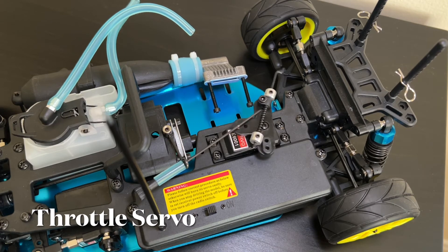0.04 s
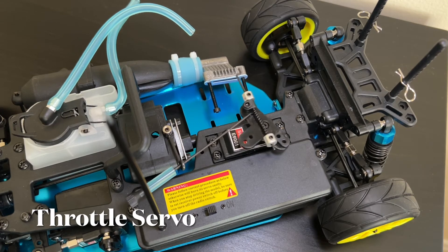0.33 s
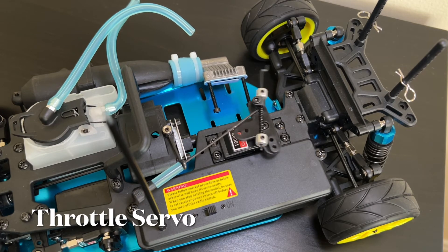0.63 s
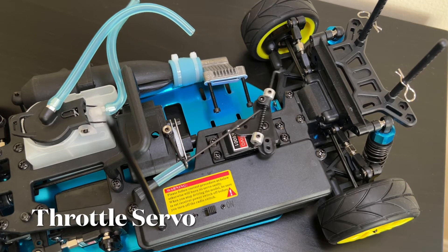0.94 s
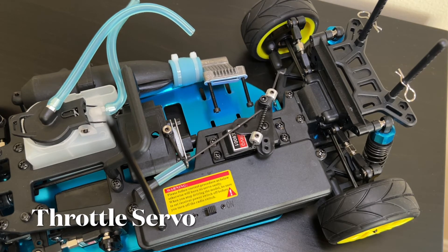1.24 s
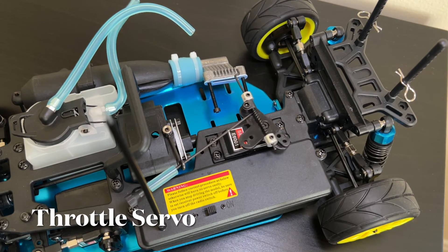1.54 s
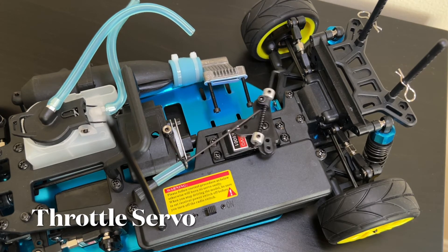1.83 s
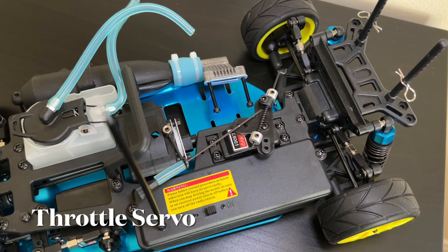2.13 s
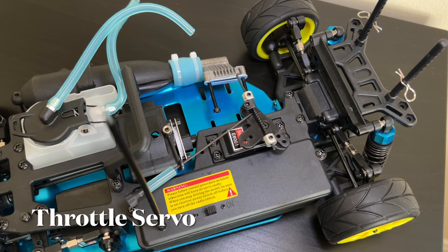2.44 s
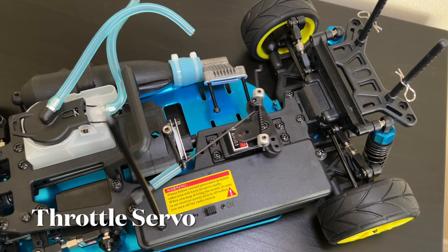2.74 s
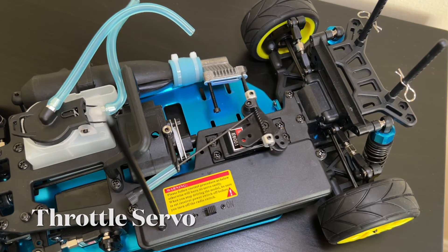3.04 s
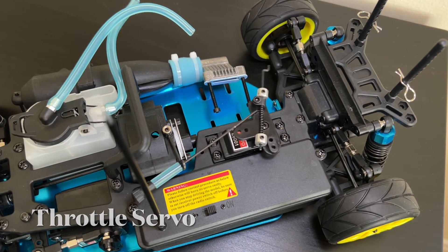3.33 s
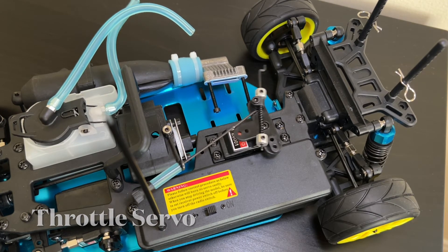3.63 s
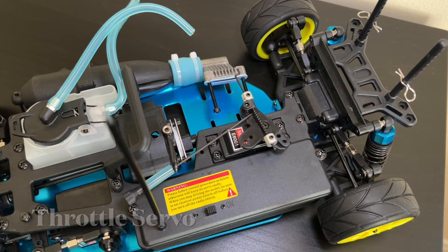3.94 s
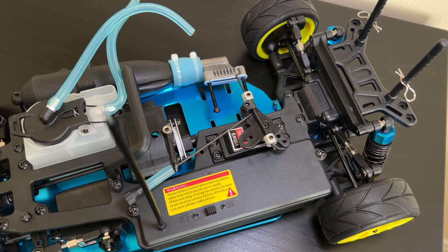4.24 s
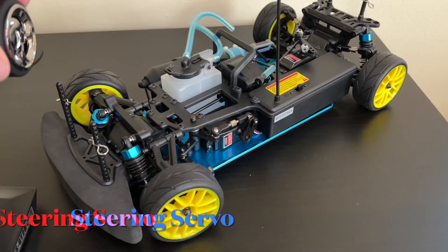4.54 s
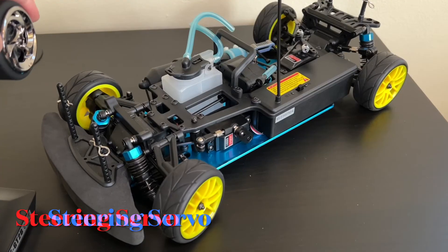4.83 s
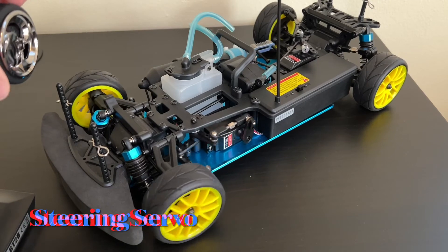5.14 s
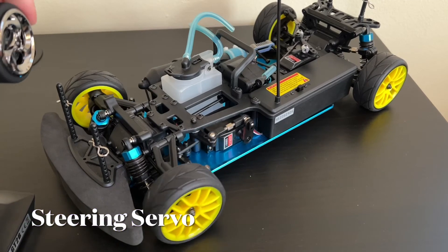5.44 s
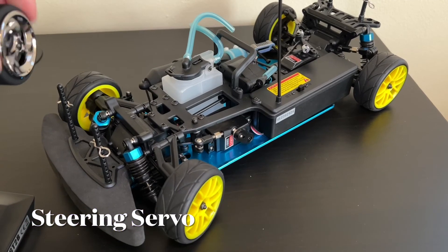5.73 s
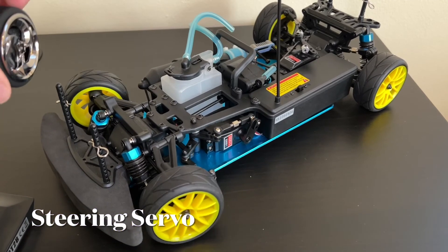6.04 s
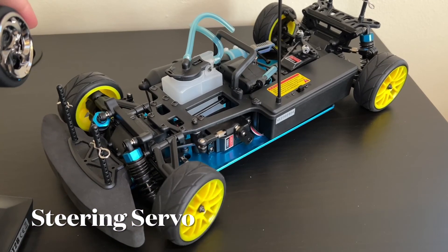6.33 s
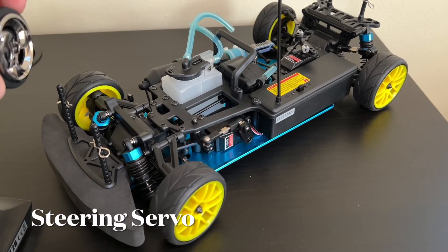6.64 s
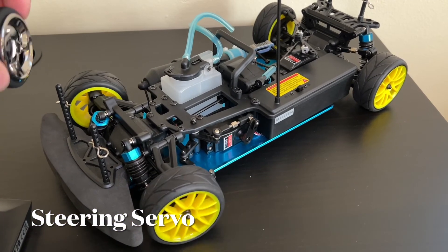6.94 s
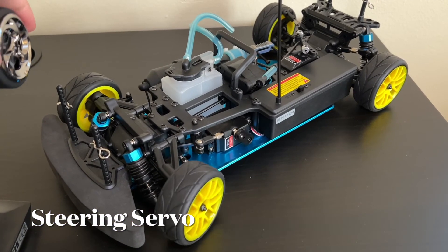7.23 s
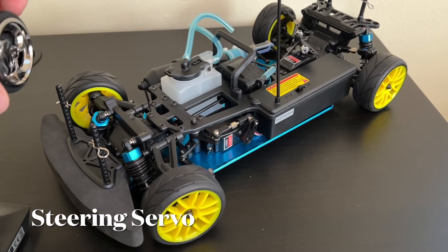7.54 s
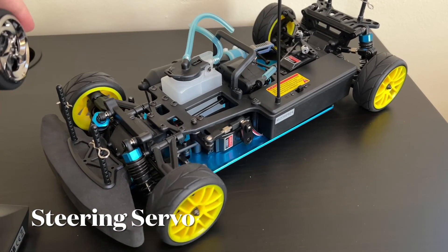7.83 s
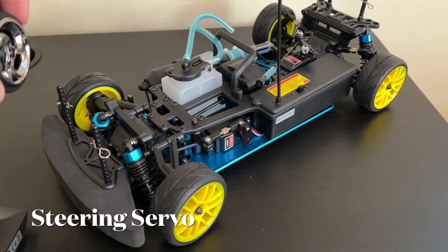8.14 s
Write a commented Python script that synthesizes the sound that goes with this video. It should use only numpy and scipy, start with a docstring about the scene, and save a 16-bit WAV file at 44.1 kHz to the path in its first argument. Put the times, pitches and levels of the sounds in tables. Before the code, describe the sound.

Small servo motors on a model car rattle and buzz in quick strokes, then whine more quietly back and forth.

```python
"""Model car servos on a table

Two hobby servos swing back and forth in a small room, close to a phone. First the throttle servo
rattles through quick strokes, snapping its linkage; then the quieter steering servo whines as it turns
the wheels. Each motor drives a ten-tooth pinion: the mesh sings, loose teeth clatter in the case.
The steering brushes ring the motor can, and the chassis thuds on its tyres over a low room hum."""
import sys
import numpy as np
from scipy import signal
from scipy.fft import rfft, irfft, next_fast_len
from scipy.io import wavfile
from scipy.ndimage import uniform_filter1d

SR = 44100
rng = np.random.default_rng(int(sys.argv[2]) if len(sys.argv) > 2 else 0)


def pcm_store(signal):
    """Save signal as 16-bit PCM."""
    levels = np.round(np.clip(np.atleast_2d(signal), -1, 1) * 32767)
    wavfile.write(sys.argv[1], SR, levels.astype(np.int16).T)


N = 365809
T = np.arange(N) / SR
FFT_SIZE = next_fast_len(N, real=True)
FREQS = np.fft.rfftfreq(FFT_SIZE, 1 / SR)
PINION_TEETH, CRAWL_HZ = 10, 417  # the steering's tooth rate idles at the crawl
HANDOVER_S = 4.318  # the listener moves from the throttle servo to the steering servo

# steering swings: start_s, brake_s, rest_s, early_tooth_hz, late_tooth_hz, whine_db, gears_db, brush_db
SWINGS = [(4.26, 4.347, 4.49, 1892, 1884, -36.5, -41.5, -40),
          (4.494, 4.593, 4.61, 1670, 1678, -43.5, -44.5, -44.5),
          (4.577, 4.678, 4.8, 1678, 1672, -46, -42.5, -44.5),
          (4.665, 4.754, 4.92, 1394, 1391, -56, -47.5, -45),
          (4.914, 5.11, 5.293, 2015, 1896, -37.5, -41.5, -40.5),
          (5.305, 5.53, 5.63, 1950, 1985, -41.5, -43.5, -44),
          (5.712, 5.96, 6.11, 1990, 1959, -37.5, -42.5, -40.5),
          (6.08, 6.296, 6.39, 1978, 2004, -41, -42.5, -43),
          (6.494, 6.703, 6.9, 2031, 1963, -38, -41.5, -40.5),
          (6.891, 7.1, 7.23, 1997, 2000, -41, -42.5, -42.5),
          (7.255, 7.45, 7.64, 2041, 1856, -38, -39, -40.5),
          (7.661, 7.847, 8.06, 1996, 2009, -41, -42.5, -45),
          (8.013, 8.203, 8.47, 1758, 1905, -39, -40, -42)]


def undb(db):
    """Decibels to gain."""
    return np.exp(np.asarray(db) * (np.log(10) / 20))


def unit(x):
    """Scale to rms 1."""
    return x / np.sqrt(np.mean(x ** 2) + 1e-18)


def on_log(hz, points):
    """Read (Hz, value) points on a log-frequency axis."""
    freqs, values = np.transpose(points)
    return np.interp(np.log(hz + 1), np.log(freqs), values)


def colour(x, points):
    """EQ with a curve of (Hz, dB) points."""
    size = next_fast_len(x.shape[-1], real=True)
    gain = undb(on_log(np.fft.rfftfreq(size, 1 / SR), points))
    return irfft(rfft(x, size) * gain, size)[..., :x.shape[-1]]


def resonate(x, modes):
    """Ring through (Hz, width Hz, dB) modes."""
    response = sum(undb(db) * FREQS * width / (FREQS * width + 1j * (FREQS ** 2 - hz ** 2))
                   for hz, width, db in modes)
    return irfft(rfft(x, FFT_SIZE) * response, FFT_SIZE)[:N]


def drift(rate_hz):
    """Smooth random motion of rms 1, changing about rate_hz times a second."""
    hold = max(int(SR / rate_hz), 1)
    steps = np.repeat(rng.standard_normal(N // hold + 1), hold)
    return unit(uniform_filter1d(steps, hold)[:N])


def fade(t, t60):
    """Exponential decay, 60 dB down after t60 seconds."""
    return np.exp(-np.log(1000) * t / t60)


def clicks(times, sizes):
    """Band-limited clicks at exact times."""
    at = np.asarray(times)[:, None] * SR
    taps = at.astype(int) + np.arange(-5, 7)
    shape = np.sinc(taps - at) * np.cos(np.pi * (taps - at) / 12) ** 2
    return np.bincount(np.clip(taps, 0, N - 1).ravel(), (shape * sizes[:, None]).ravel(), N)


def strike(events, ring):
    """Trigger a ring at each (s, dB) row."""
    times, db = np.transpose(events)
    return signal.fftconvolve(clicks(times, undb(db)), ring / np.abs(ring).max())[:N]


def gear_whine(teeth, partials, wobble_rad, flutter_db):
    """Mesh tone from the running tooth count; the off-centre pinion bends it once a turn."""
    phase = 2 * np.pi * teeth + wobble_rad * np.sin(2 * np.pi * teeth / PINION_TEETH + drift(15))
    return unit(sum(undb(db + flutter_db * drift(130)) * np.sin(k * phase) for k, db in partials))


def gear_clatter(teeth, scatter_db, slop, wear_db, scrape):
    """Each tooth lands early or late (by slop tooth gaps) with its own force, then scrapes along."""
    tooth = np.arange(int(teeth[-1]))
    timing, force = rng.standard_normal((N // 20, 2))[tooth].T
    wear = rng.standard_normal(PINION_TEETH)[tooth % PINION_TEETH]
    late = timing * np.interp(tooth, teeth, np.broadcast_to(slop, N))
    hits = clicks(np.interp(tooth + late, teeth, T), undb(scatter_db * force + wear_db * wear))
    friction = rng.standard_normal(N) * np.exp(-2 * (teeth % 1))
    return unit(unit(hits) + scrape * unit(friction))


def throttle_servo():
    """Each stroke speeds up and brakes in an arch; the loaded gears chatter and ring the case."""
    # motor strokes: start_s, end_s, top_tooth_hz, level_db, whine_db (on top of level_db)
    strokes = [(-.1, 0.043, 2128, -25, -17), (.104, .302, 1786, -23.5, -27), (.333, .5, 2136, -24.5, -7),
               (.549, .76, 1451, -22.8, -17), (.768, .945, 2018, -25.5, -6.5),
               (1.241, 1.416, 2124, -23.5, -16), (1.689, 1.862, 2176, -25, -9.5),
               (2.142, 2.316, 2202, -23, -22), (2.387, 2.487, 698, -43.5, -14.5),
               (2.594, 2.66, 699, -38.5, -14.5), (2.631, 2.821, 1201, -28.5, -10),
               (2.912, 3.049, 1447, -22.5, -15), (3.138, 3.301, 1498, -26.5, -19),
               (3.32, 3.491, 1076, -29, -11.5), (3.546, 3.678, 1754, -25, -22),
               (3.712, 3.853, 1895, -23, -23), (3.948, 4.084, 2086, -25.5, -5),
               (4.084, 4.215, 1886, -22, -23)]
    # how the case radiates the clatter: freq_hz, gain_db
    case_eq = [(300, -22), (700, -15.5), (1200, -7.5), (1600, -11), (2000, -0.5), (2700, -3), (3300, 0),
               (3900, -2), (4500, 1), (5400, 5.5), (6700, -4), (7600, 0.5), (8900, 0), (9600, 4.5),
               (10400, -5), (11900, -2), (13200, -2), (14100, -2.5), (15300, 0)]
    # resonances of case and deck: pitch_hz, width_hz, gain_db
    case_modes = [(1990, 205, 2), (2906, 200, 4), (3288, 45, -14), (4400, 140, -7), (5000, 53, -14),
                  (5270, 190, -2.5), (5450, 39.3, -13), (6370, 50, -2), (6280, 54, 3), (7144, 180, 8),
                  (7340, 46, -6), (9100, 46, 5), (8860, 70, -13.5), (11920, 720, 6.5), (14260, 96, 14)]
    # mesh partials: tooth_rate_multiple, level_db
    partials = [(1, -8.5), (2, -8), (3, -3), (4, 3)]
    # how the deck radiates the mesh tone: freq_hz, gain_db
    deck_eq = [(700, -15), (1150, 1), (1500, 1), (2100, 9.5), (3200, 7.5), (4200, -20), (5400, 6),
               (6300, 4.5), (9000, -2)]
    onset_db, attack_s, stop_db, release_s = 15, .016, 21.5, .014  # load dips at both ends of a stroke
    ease_db = 3  # and eases along the way
    tooth_hz, whine_gain, load = np.full(N, 300.), np.zeros(N), np.zeros(N)
    for start, end, top_hz, level_db, whine_db in strokes:
        on = (T > start) & (T < end)
        progress = (T[on] - start) / (end - start)
        tooth_hz[on] = top_hz * (1 - .5 * (2 * progress - 1) ** 2)
        whine_gain[on] = undb(whine_db) * np.sin(np.pi * progress) ** 2
        attack_db = onset_db * np.exp((start - T[on]) / attack_s)
        release_db = stop_db * np.exp((T[on] - end) / release_s)
        load[on] += undb(level_db - attack_db - release_db - ease_db * progress)
    load = uniform_filter1d(load, size=330)  # the rotor takes a moment to start
    teeth = np.cumsum(tooth_hz * (1 + .009 * drift(150))) / SR
    slop = np.clip(.02 + 1.4 * load, 0, .2)  # teeth keep time under light load, rattle when pushed
    hits = gear_clatter(teeth, scatter_db=4, slop=slop, wear_db=2, scrape=.82)
    gears = colour(hits * undb(.79 * drift(70) + drift(900)), case_eq)
    case = unit(unit(gears) + undb(-3.5) * unit(resonate(gears, case_modes)))
    mesh = whine_gain * colour(gear_whine(teeth, partials, wobble_rad=.3, flutter_db=3.5), deck_eq)
    return load * (undb(.05) * case + undb(4.5) * mesh)


def room_tone():
    """Rumble and faint hiss, with a wavering hum and thin whistle that depend on the listening spot."""
    # rumble spectrum: freq_hz, gain_db
    rumble_eq = [(20, -44), (32, -17), (48, 3), (65, 1.5), (125, -3), (230, -5.5), (420, -8.5), (700, -9),
                 (1200, -18.5), (2200, -32), (5000, -60)]
    # hum lines: pitch_hz, by_throttle_db, by_steering_db
    hum_lines = [(68.5, -66.5, -67), (100.7, -60.5, -60.5), (132.8, -64.5, -62), (195, -63, -90),
                 (352, -101, -69), (957, -70, -71)]
    mid, side = colour(rng.standard_normal((2, N)), rumble_eq)
    side = colour(side, [(40, -17), (130, -9), (300, -2.5), (700, .5)])
    rumble = unit(mid + side * np.array([[1], [-1]])) * undb(-54.5 + drift(6.2))
    by_throttle = T < HANDOVER_S
    hum = np.zeros(N)
    for hz, throttle_db, steering_db in hum_lines:
        line = unit(np.sin(2 * np.pi * hz * T + 1.85 * drift(16)))
        hum += undb(np.where(by_throttle, throttle_db, steering_db)) * line
    whistle = undb(np.where(by_throttle, -70, -60)) * unit(np.sin(2 * np.pi * 15750 * T))
    hiss_eq = [(150, -7), (600, 9), (1000, 7), (4000, 3.5), (15000, -31)]
    hiss = undb(-61) * unit(colour(rng.standard_normal((2, N)), hiss_eq))
    return rumble + hum + whistle + hiss


def linkage_snaps():
    """The throttle linkage snaps with a short, bright ring."""
    # snaps: start_s, level_db
    snaps = [(0.163, -14.5), (1.2131, -61), (1.277, -26), (1.302, -11), (1.3329, -15), (1.3563, -16),
             (1.677, -41), (1.7404, -20), (1.812, -19), (2.1789, -23), (2.2058, -15.5), (2.2393, -31),
             (2.5965, -44), (2.622, -37.5), (2.9604, -22), (3.7618, -20)]
    # linkage resonances: pitch_hz, t60_s, level_db
    modes = [(1950, 0.069, 6), (2023, 0.046, -1), (3730, .02, 7), (5080, .02, -5), (6320, 0.048, 3),
             (8830, 0.013, 1), (11520, 0.0061, 15.5)]
    t = T[:SR // 4]
    ring = sum(undb(db) * np.sin(2 * np.pi * hz * t) * fade(t, t60) for hz, t60, db in modes)
    attack = np.clip(t / .00057, 0, 1)
    return undb(4) * strike(snaps, ring * attack)


def chassis_knocks():
    """On some strokes and each long swing the chassis rocks on its tyres and thuds into the table."""
    # low thuds during or just after some throttle strokes: start_s, level_db
    knocks = [(0.2, -38), (0.839, -43.5), (1.286, -40), (1.75, -40.5), (2.189, -42), (4.129, -41),
              (4.258, -45)]
    # how the chassis radiates: freq_hz, gain_db
    chassis_eq = [(40, -29), (120, 3), (240, 1.5), (350, -18.5), (900, -11), (2000, -27), (6000, -67)]
    kick_lag_s, kick_db, long_swing_s = .06, -41, .15
    kicks = [(start + kick_lag_s, kick_db) for start, brake, *_ in SWINGS
             if brake - start > long_swing_s]
    t = T[:SR // 4]
    burst = rng.standard_normal(len(t)) * fade(t, t60=.17) * np.clip(t / .011, 0, 1)
    return undb(2.5) * strike(knocks + kicks, colour(burst, chassis_eq))


def steering_swing(t, start, brake, rest, early_hz, late_hz, whine_db, gears_db, brush_db):
    """Tooth rate and layer gains for one swing: load grows as the wheels turn, until the motor brakes."""
    run_up_s, braking_s, current_rise_s = .046, .067, .048
    whine_swell_db, gear_swell_db, gear_fall_db_per_s, current_drop_db = 6.5, 9.5, 82, 21
    running, braking = t - start, np.maximum(t - brake, 0)
    turned = np.minimum(running / (brake - start), 1)
    drive = (1 - np.exp(-(running / run_up_s) ** 2)) * np.exp(-(braking / braking_s) ** 2)
    cruise_hz = early_hz + (late_hz - early_hz) * turned
    tooth_hz = CRAWL_HZ + (cruise_hz - CRAWL_HZ) * drive
    current = np.minimum(running / current_rise_s, 1)
    whine_gain = undb(whine_db - whine_swell_db * (1 - turned)) * np.sqrt(drive)
    gear_fall_db = gear_fall_db_per_s * braking * (1 - drive)
    gear_gain = current * undb(gears_db - gear_swell_db * (1 - turned) - gear_fall_db)
    brush_gain = current * undb(brush_db - current_drop_db * (braking / (rest - brake)) ** 1.76)
    return tooth_hz, whine_gain, gear_gain, brush_gain


def steering_servo():
    """The motor runs up, holds and brakes for each swing: mesh whine, gear rattle and brush buzz."""
    # mesh overtones: tooth_rate_multiple, level_db
    partials = [(2, 3), (3, 0), (4, -0.5), (5, -11), (6, -20)]
    # how the case radiates the rattle: freq_hz, gain_db
    case_eq = [(300, -5.5), (900, -27), (1600, 7.5), (2800, 6), (4400, 2), (5300, -5), (7000, -1),
               (8500, -2), (10200, -13), (12000, -6), (16000, -5)]
    controls = np.zeros((4, N))
    for start, brake, rest, *settings in SWINGS:
        on = (T > start) & (T < rest)
        swing = steering_swing(T[on], start, brake, rest, *settings)
        controls[:, on] = np.maximum(controls[:, on], swing)
    tooth_hz = np.maximum(controls[0], CRAWL_HZ) * (1 + .007 * drift(30))
    fade_in = np.clip((T - HANDOVER_S) / .028, 0, 1)
    whine_gain, gear_gain, brush_gain = controls[1:] * fade_in
    teeth = np.cumsum(tooth_hz * (1 + .004 * drift(200))) / SR
    # the mesh only sings at speed; slower, its teeth rattle
    singing = np.clip((tooth_hz - 1130) / 420, 0, 1)
    mesh = whine_gain * gear_whine(teeth, [(1, 0)], wobble_rad=.5, flutter_db=2.5)
    # the teeth seat just after the run-up, and the overtones bloom
    seated = np.clip((np.interp(T - .025, T, tooth_hz) - 1000) / 850, .15, 1)
    overtones = gear_gain * seated * gear_whine(teeth, partials, wobble_rad=.36, flutter_db=3.5)
    hits = gear_clatter(teeth, scatter_db=3.5, slop=.05, wear_db=2.5, scrape=.6)
    rattle = gear_gain * (1 - .59 * singing) * unit(colour(hits, case_eq))
    buzz = brush_gain * motor_brushes(teeth / PINION_TEETH, spark=.35)
    return singing * (undb(2) * mesh + undb(.5) * overtones) + undb(2.5) * rattle + undb(2) * buzz


def motor_brushes(turns, spark):
    """Six commutator contacts a turn ring the can; each swing tips the brushes into a new pattern."""
    # how the motor can radiates: freq_hz, gain_db
    can_eq = [(2000, -30.5), (7000, -21.5), (9200, -12.5), (10400, -12.5), (11300, -2), (12200, 0),
              (13000, -2.5), (14000, -3.5), (14800, -13), (15600, -1.5)]
    count = np.arange(int(turns[-1] * 6))
    contact, turn = count % 6, count / 6
    swing = np.searchsorted([start for start, *_ in SWINGS], np.interp(turn, turns, T))
    offset, force = rng.standard_normal((2, len(SWINGS) + 1, 6))[:, swing, contact]
    # one way every second contact is strong, the other way every third
    strong = np.where(swing % 2, contact % 2 == 0, contact % 3 == 0)
    contacts = clicks(np.interp(turn + .0012 * offset, turns, T), undb(16 * strong + 1.5 * force))
    return unit(colour(unit(contacts) + spark * rng.standard_normal(N), can_eq))


def slack_ticks():
    """The steering gears take up their slack with dry ticks."""
    # ticks: start_s, level_db
    ticks = [(5.3428, -34), (5.6238, -41), (5.7534, -37.5), (6.125, -34), (6.4193, -39.5), (6.9227, -34.5),
             (7.6969, -33.5)]
    # tick spectrum: freq_hz, gain_db
    tick_eq = [(500, 2), (2000, 6), (3800, 4), (6000, -13), (12000, -5.5)]
    t = T[:SR // 4]
    burst = rng.standard_normal(len(t)) * fade(t, t60=.012)
    return undb(8) * strike(ticks, colour(burst, tick_eq))


def room(x, early_db, tail_db, right_lag_samples):
    """Direct sound, reaching the left first; early scatter off car and table; then the room's tail."""
    # room decay: freq_hz, t60_s
    decay = [(250, 0.31), (2000, 0.44), (5000, 0.5), (8000, 0.46), (12000, 0.23), (16000, 0.21)]
    t = T[:int(.7 * SR)]
    hz, frame_s, spectrum = signal.stft(rng.standard_normal((2, len(t))), SR)
    _, tail = signal.istft(spectrum * fade(frame_s, on_log(hz, decay)[:, None]), SR)
    tail = tail[:, :len(t)] * np.clip(t / .028, 0, 1)
    early = rng.standard_normal((2, len(t))) * fade(t, t60=.039)
    response = (undb(early_db) * unit(early) + undb(tail_db) * unit(tail)) / np.sqrt(len(t))
    response[0, 0] += 1
    response[1, right_lag_samples] += 1
    return signal.fftconvolve(x[None], unit(response) / np.sqrt(len(t)), axes=1)[:, :N]


def scene():
    """Both servos in the room, their mid treble leaning left, over chassis thuds and room tone."""
    # stereo tilt of the servos: freq_hz, left_minus_right_db
    tilt = [(700, 2.5), (2000, -1.5), (3400, 4.5), (4500, 5), (5800, 7.5), (7300, 3), (9500, -3)]
    steering_left_db = 1.5  # the steering servo stands a little to the left
    throttle = room(throttle_servo() + linkage_snaps(), early_db=2.5, tail_db=-7.5, right_lag_samples=5)
    ticks = room(slack_ticks(), early_db=2.5, tail_db=-7.5, right_lag_samples=5)
    steering = room(steering_servo(), early_db=-1, tail_db=-6, right_lag_samples=2)
    left, right = throttle + ticks + steering * undb(steering_left_db * np.array([[.5], [-.5]]))
    left = colour(left, [(hz, db / 2) for hz, db in tilt])
    right = colour(right, [(hz, -db / 2) for hz, db in tilt])
    return undb(1.5) * np.array([left, right]) + chassis_knocks() + room_tone()


def record(dry):
    """The phone's two spaced ports hear the treble alike but out of step; the very top is cut."""
    alike_above_hz, port_lag_s, in_step_hz, top_hz = 8300, .000274, 12060, 15700
    left, right = rfft(dry, FFT_SIZE)
    share = np.clip((FREQS - alike_above_hz) / 1000 + .5, 0, 1)
    phase_lead = np.exp(2j * np.pi * (FREQS - in_step_hz) * port_lag_s)
    right = np.sqrt(1 - share) * right + np.sqrt(share) * left * phase_lead
    heard = irfft(np.array([left, right]), FFT_SIZE)[:, :N]
    return signal.sosfilt(signal.ellip(10, .2, 80, top_hz, fs=SR, output="sos"), heard)


dry = scene()
out = record(dry)
pcm_store(out)
```